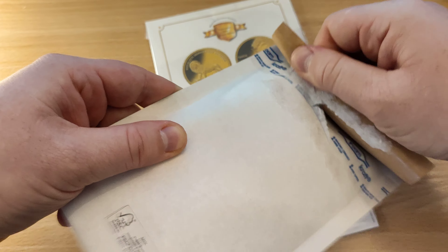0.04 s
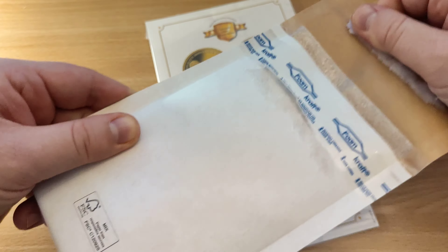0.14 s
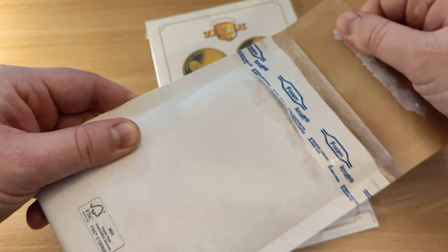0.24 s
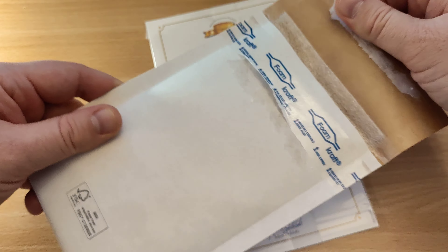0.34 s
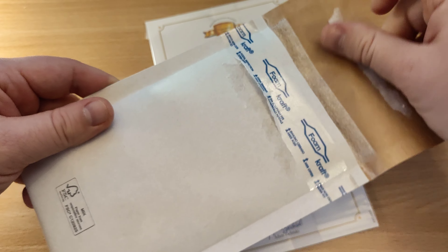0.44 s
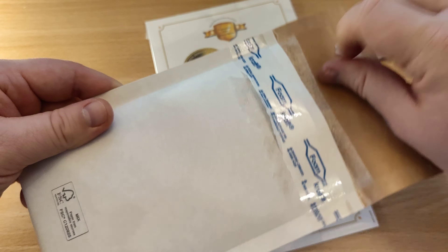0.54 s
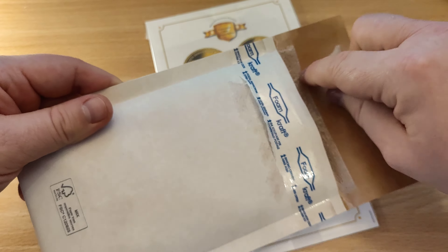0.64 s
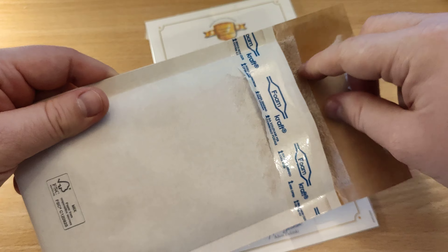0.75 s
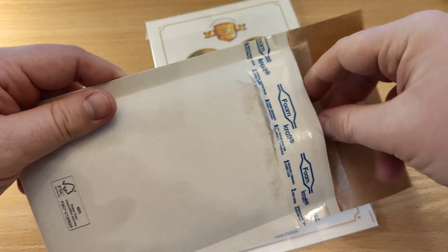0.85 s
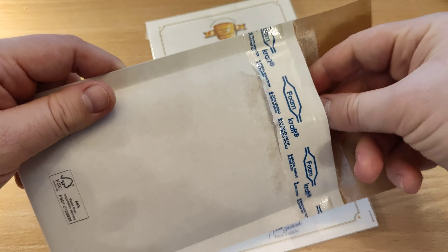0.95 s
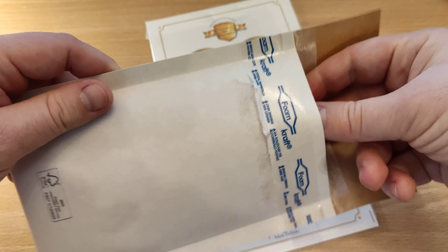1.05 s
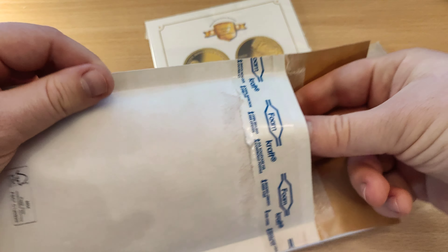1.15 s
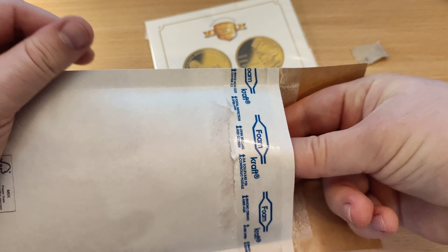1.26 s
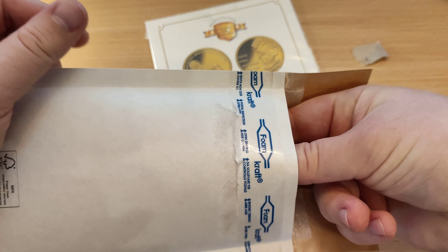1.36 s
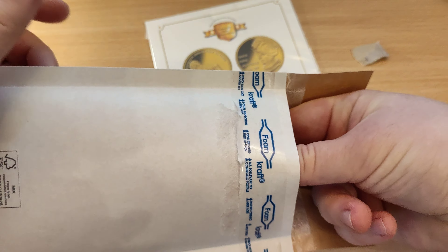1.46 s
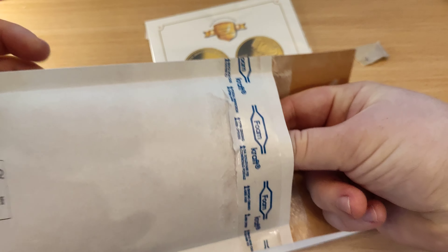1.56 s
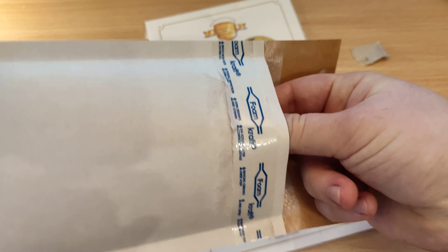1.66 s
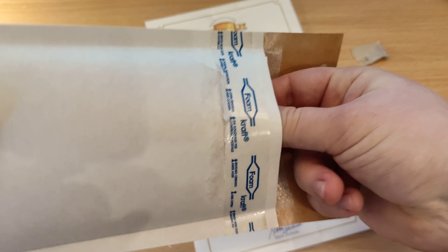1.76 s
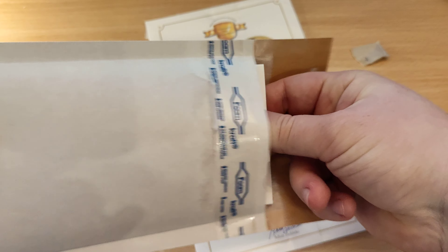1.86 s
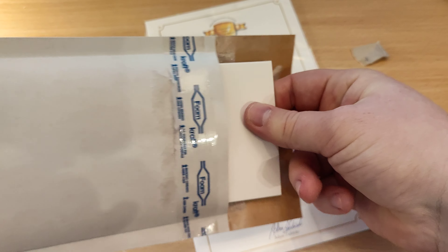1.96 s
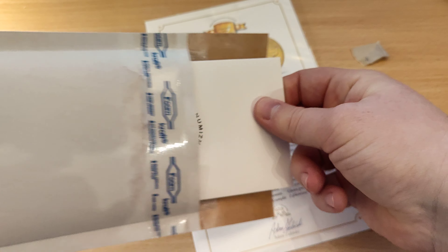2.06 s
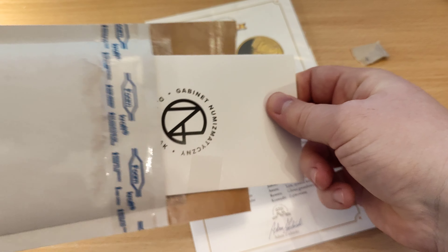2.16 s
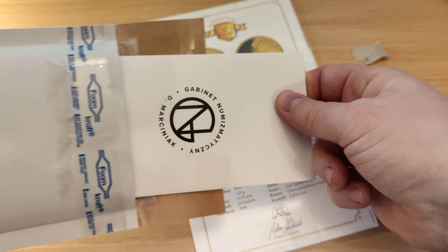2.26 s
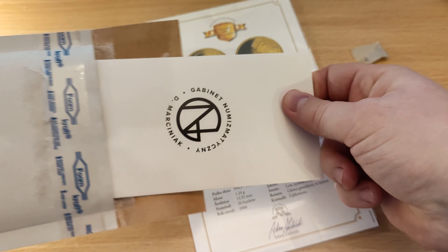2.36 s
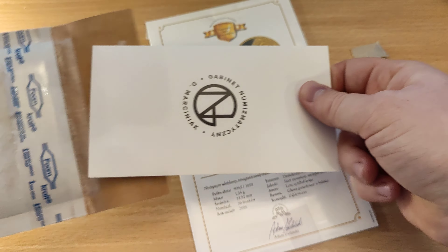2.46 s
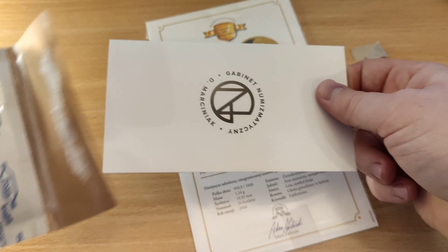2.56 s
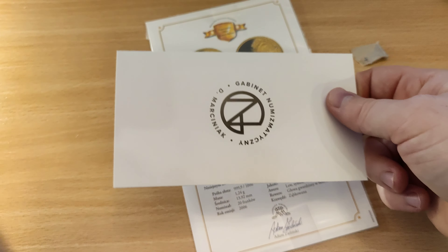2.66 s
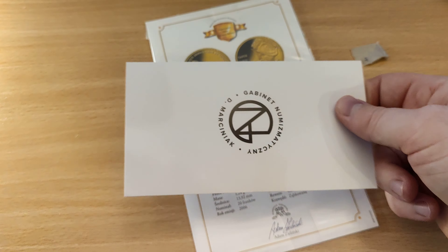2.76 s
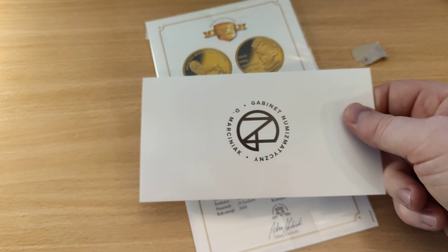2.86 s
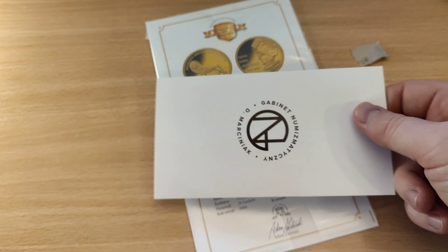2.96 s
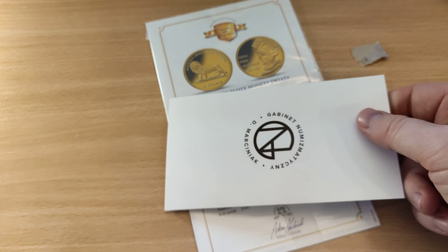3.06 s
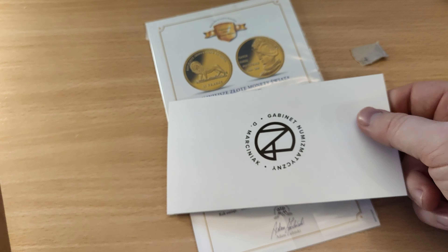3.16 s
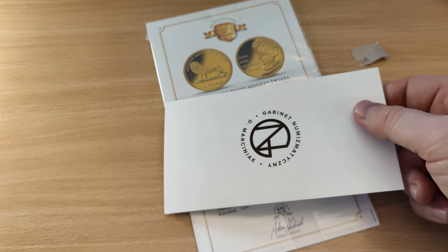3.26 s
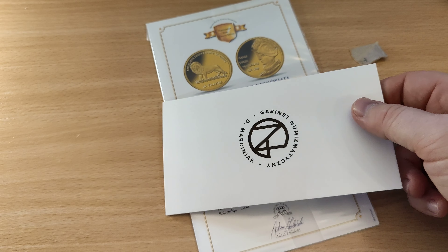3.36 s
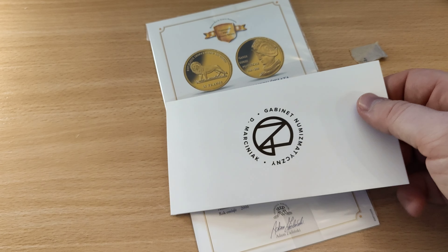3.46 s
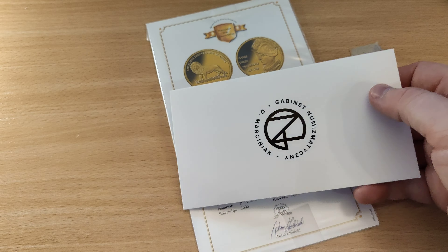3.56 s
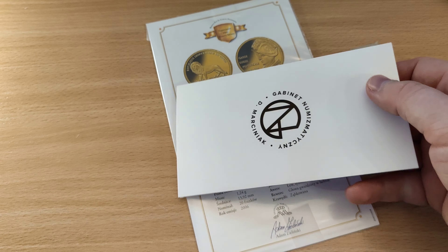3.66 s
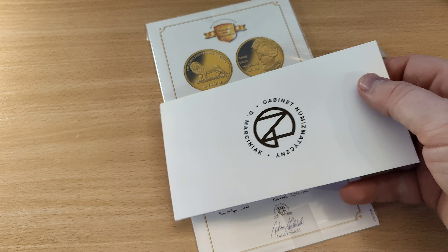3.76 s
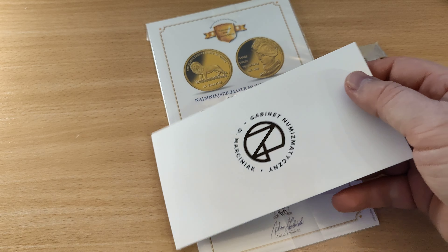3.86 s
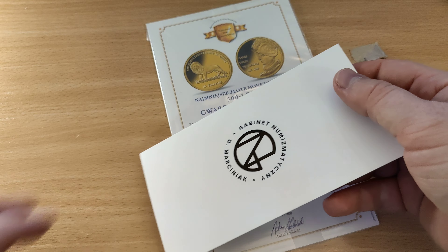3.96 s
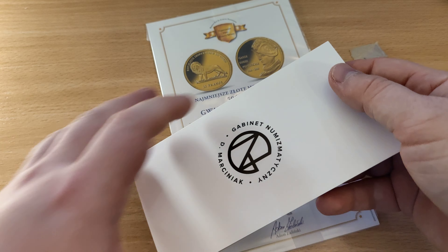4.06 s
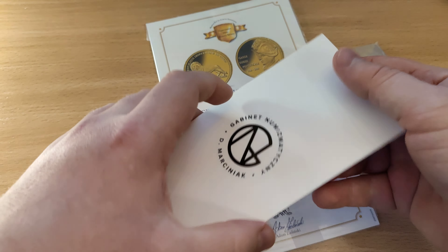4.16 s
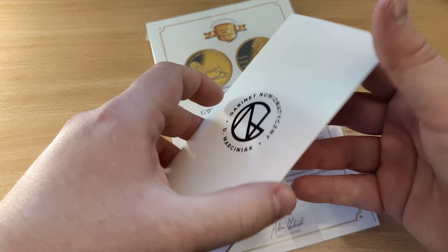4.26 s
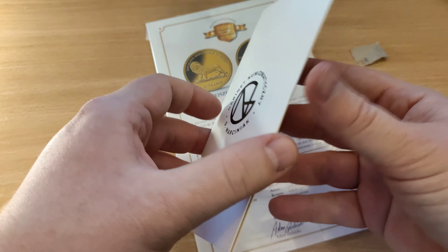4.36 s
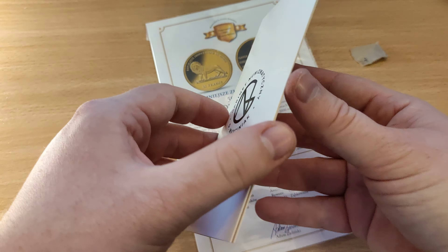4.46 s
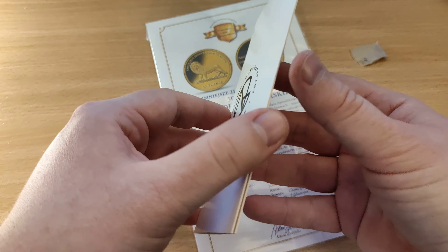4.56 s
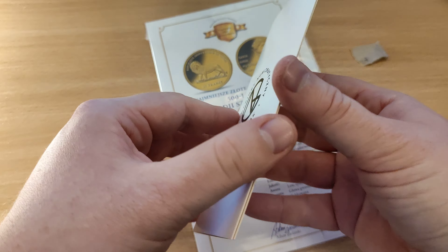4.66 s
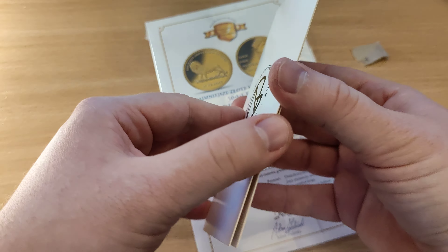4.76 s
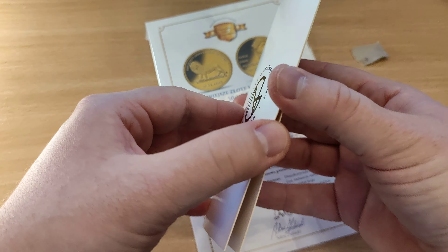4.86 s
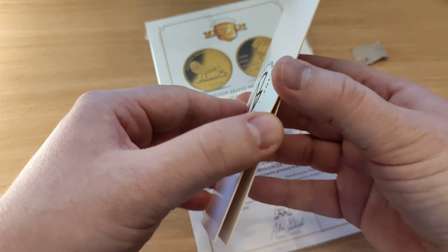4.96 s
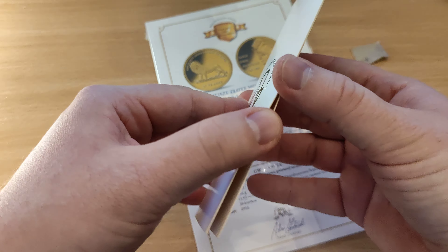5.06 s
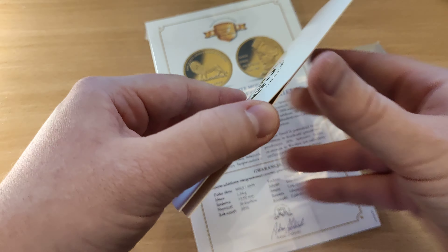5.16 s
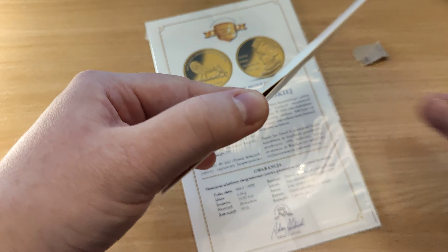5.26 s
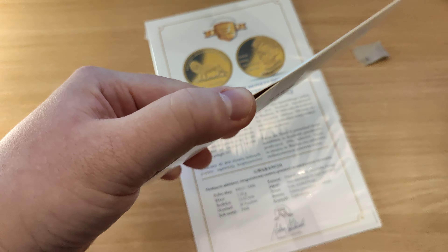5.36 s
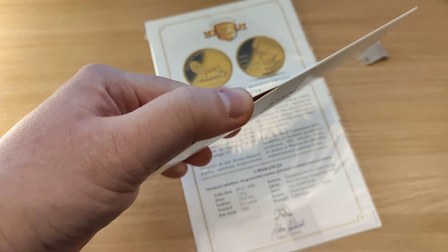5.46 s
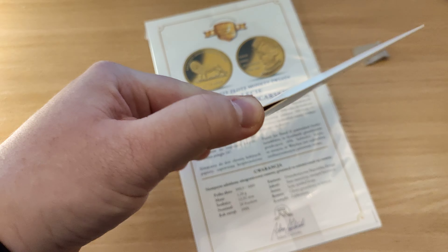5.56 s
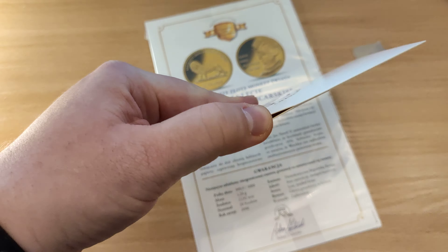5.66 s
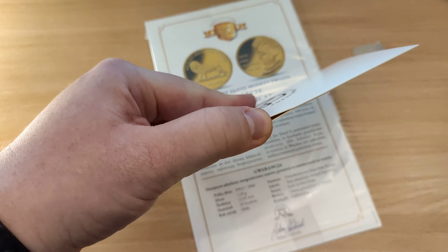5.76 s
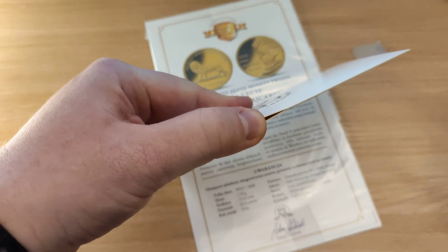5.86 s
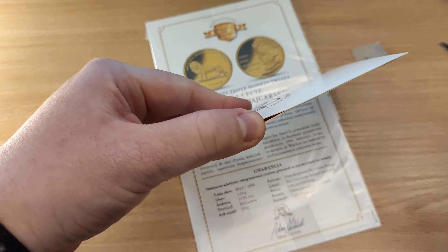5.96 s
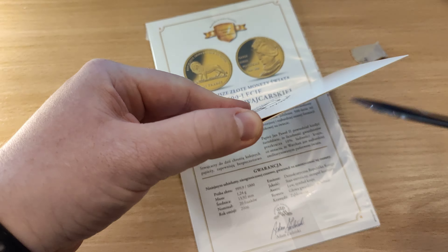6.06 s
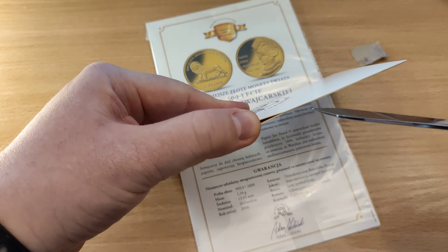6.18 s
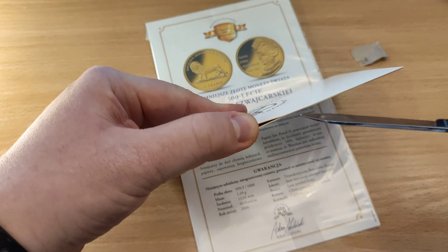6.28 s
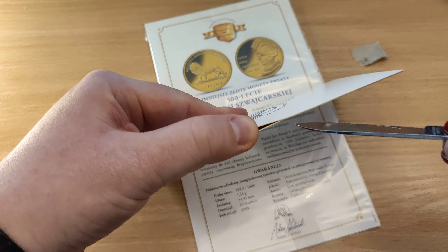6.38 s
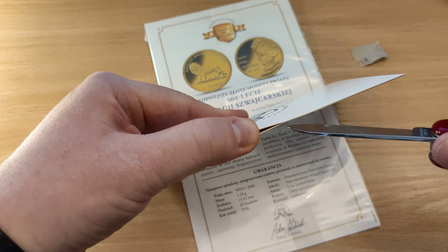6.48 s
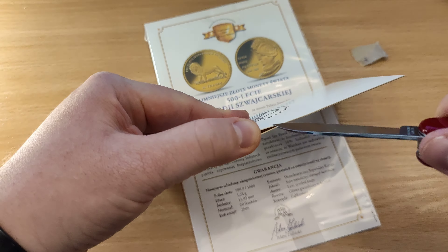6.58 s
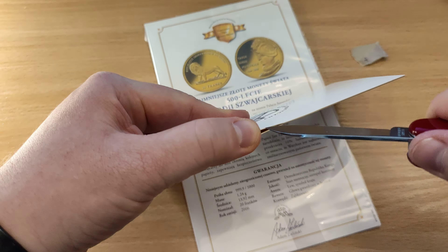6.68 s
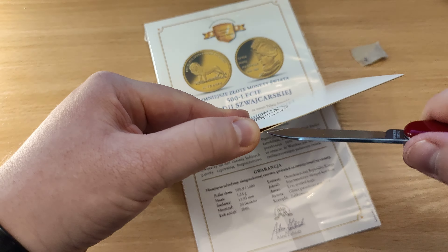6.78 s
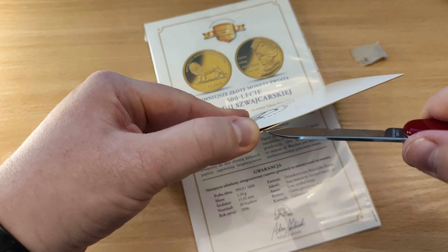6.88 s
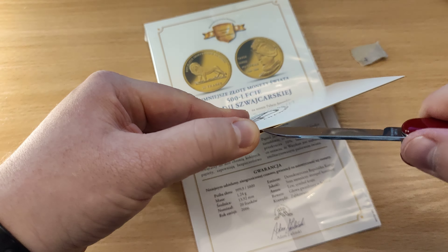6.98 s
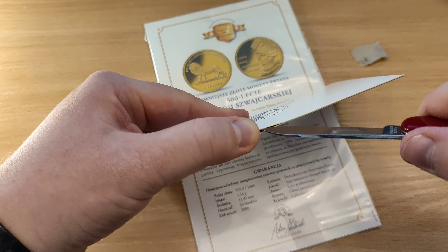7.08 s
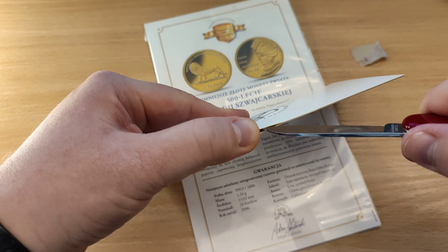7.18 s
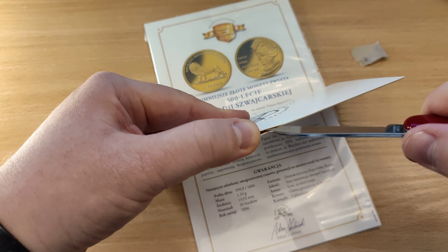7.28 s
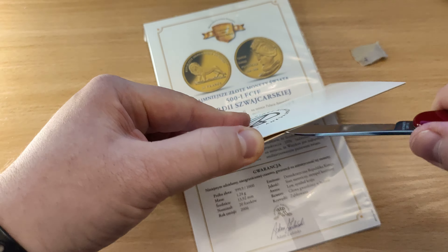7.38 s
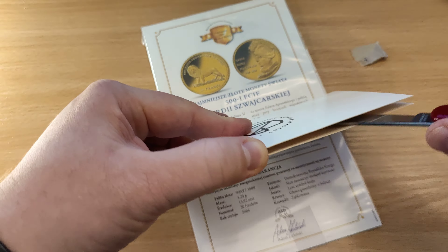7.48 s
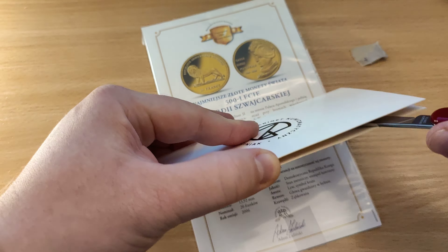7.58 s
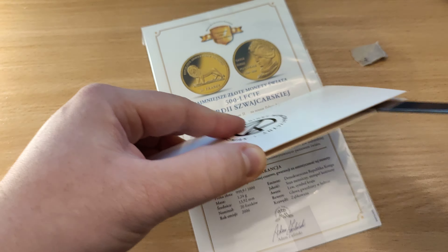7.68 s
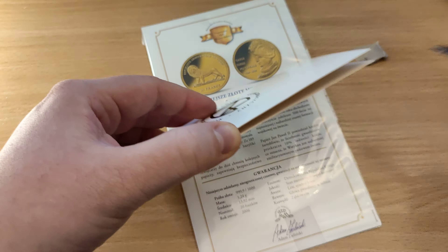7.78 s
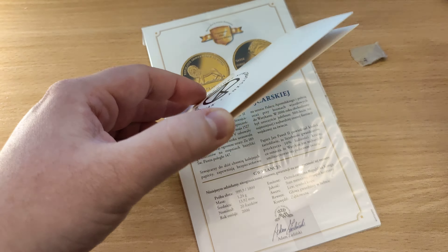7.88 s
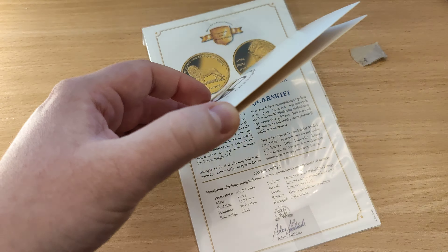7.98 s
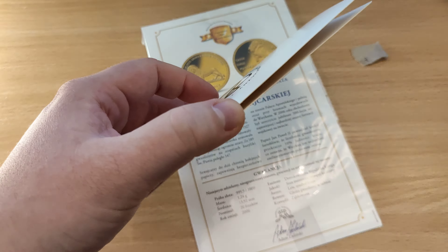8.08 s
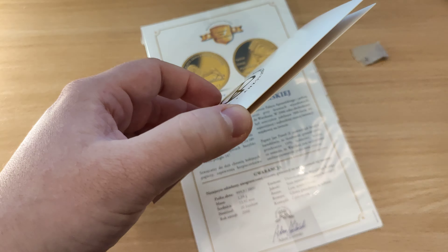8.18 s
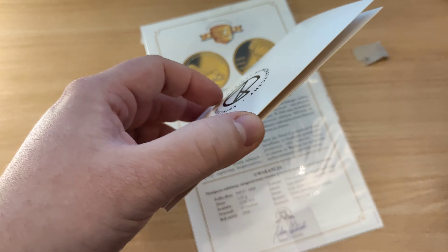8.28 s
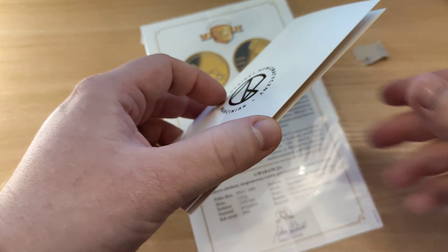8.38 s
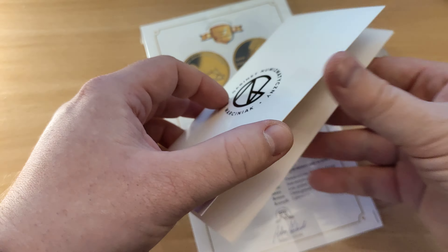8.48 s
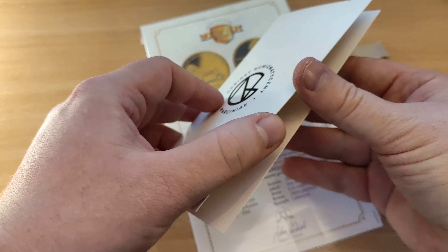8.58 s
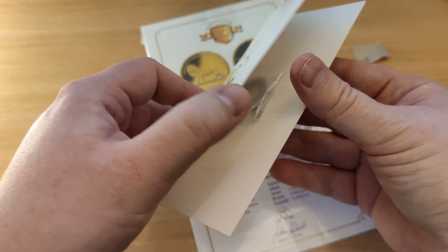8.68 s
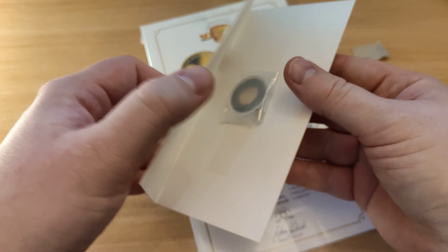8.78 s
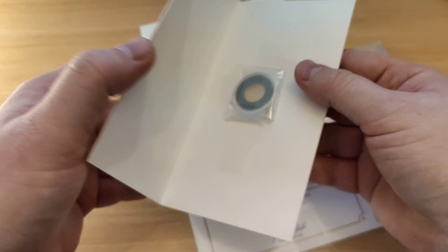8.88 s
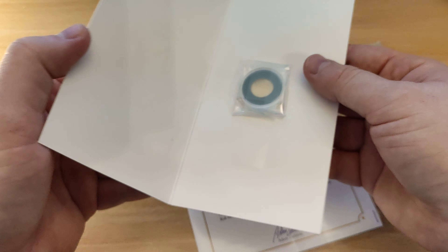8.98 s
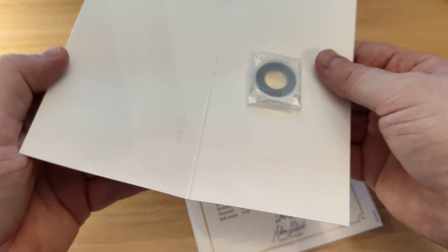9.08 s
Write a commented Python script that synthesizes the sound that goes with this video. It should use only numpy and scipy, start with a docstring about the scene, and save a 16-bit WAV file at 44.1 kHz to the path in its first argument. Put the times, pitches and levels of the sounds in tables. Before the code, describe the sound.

Close stereo microphone at a wooden desk in a small quiet room, with steady low, fuzzy hum and faint air. At 0 s a loud paper rip is already under way; glue rasps and snaps, with the sharpest crack near 0.16 s and brisk rustling to 0.35. Separate pops at 0.67, 0.94 and 1.0 accompany hands entering the mailer. From 1.2 to 2.3 softer rubbing swells and falls; a card slides out with brighter swishes around 2.5-3.1, with soft bumps. A knock at 3.6 and a firmer double clatter at 3.98 and 4.06 mark things set down. Then it is nearly still, with tiny creases. At 5.8-6.1 light blade ticks cluster. Quiet again until brief scrapes at 7.0 and 7.4, a loud seal snap at 7.54, and short rasps to 7.9. Handle taps and desk bumps come at 8.1-8.3, a crisp unfolding crack at 8.58, then faint rustle to about 9.1.

```python
"""At a wooden desk in a quiet room with a low hum, hands peel open a padded paper mailer, slide out
a folded card, set the mailer and a pocket knife down, slit a seal and unfold the card, all close by.
Sliding paper is shaped noise with small ticks; creases, glue and knife clatter are clumps of tiny breaks.
Rasps, desk thumps and knife touches are noise or blows ringing resonances. The room adds short
noise tails to paper and knife, over steady room noise and fuzzy low tones."""
import sys
import numpy as np
from scipy import signal
from scipy.fft import rfft, irfft, next_fast_len
from scipy.io import wavfile
from scipy.ndimage import uniform_filter1d

SR = 44100
rng = np.random.default_rng(int(sys.argv[2]) if len(sys.argv) > 2 else 0)


def wav_record(signal):
    """Record a signal, one row per channel, as 16-bit PCM in the file named by sys.argv[1]."""
    frames = np.transpose(np.atleast_2d(signal))
    bounded = np.clip(frames, -1, 1)
    # unit amplitude maps onto the largest positive 16-bit level
    quanta = np.round(bounded * 32767).astype(np.int16)
    wavfile.write(sys.argv[1], SR, quanta)


N = 402633  # length in samples

# Steady room noise. Each row: frequency in Hz, level per Hz in relative dB.
AIR_SPECTRUM = [(12, -57), (20, -20), (48, -38.5), (125, -11), (175, -15.5), (250, -7.5), (320, -11),
                (477, -17.5), (1020, -35), (1170, -32.5), (6880, -49.5), (15100, -43), (16400, -48.5)]
AIR_DB = -61.5  # overall level
# Fuzzy tones of a far machine. Each row: frequency in Hz, width in Hz, level in dB.
HUMS = [(136.2, 6, -69.5), (196, 12, -71), (250, 30, -62.5), (294.4, 14, -72.5), (1002, 3.2, -82)]
# How alike left and right are. Each row: frequency in Hz, likeness from 0 to 1.
LIKENESS = [(60, 0.4), (180, 1), (550, 0.42), (1650, 0.076), (4970, 0), (15000, 0)]

# Paper slides on paper and skin, one row a stroke. Each row: start of full force in seconds,
# rise, hold and fall in seconds, hiss in dB, sheet rumble in dB over hiss, fizz in dB over hiss.
STROKES = [(0, .01, 0.012, 0.046, -38, -2.5, -6), (0.093, 0.06, 0.037, 0.049, -51.5, -0.5, 2),
           (0.221, 0.089, 0.087, 0.044, -43, -9.5, -39), (0.294, .006, 0.019, 0.011, -56, -9, -32),
           (0.461, 0.039, .005, 0.052, -58.5, 3.5, -4), (0.566, 0.062, 0.0062, 0.038, -59.5, 1, 2.5),
           (0.686, 0.045, 0.04, 0.049, -50.5, -5, -10), (0.87, 0.039, 0.065, .05, -59.5, -1, -3),
           (0.985, 0.1, .005, 0.16, -50.5, -4.5, -3), (1.177, 0.14, 0.053, .1, -58.5, -11, -11),
           (1.354, 0.32, .005, 0.16, -48, -6, -2), (1.679, 0.13, 0.018, 0.059, -54.5, -1, 1),
           (1.743, 0.029, 0.0044, 0.028, -54, -11, 2), (1.852, 0.011, .005, 0.09, -51, 1.5, -15),
           (1.962, 0.082, 0.029, 0.57, -51, -7, 1), (2.138, 0.039, 0.018, .1, -52.5, -18, 8),
           (2.286, 0.39, 0.021, 0.16, -63.5, -1, 14), (2.508, 0.16, 0.0054, 0.087, -69.5, -7, 22.5),
           (2.541, 0.076, 0.052, 0.063, -54, 1.5, -6), (2.661, 0.098, 0.02, 0.014, -46, -17, -6),
           (2.973, 0.062, 0.0046, 0.039, -57, -2, -11), (3.088, .01, .12, 0.031, -62.5, -18, -1),
           (3.115, 0.037, 0.0076, 0.012, -47, -1, -6), (3.29, 0.043, 0.004, 0.34, -66, -7, 1),
           (3.454, 0.076, 0.14, 0.16, -62.5, -15, -0.5), (4.088, 0.14, 0.026, 0.23, -63.5, 1.5, -24.5),
           (4.267, 0.2, 0.1, 0.046, -71.5, -14.5, -3.5), (4.848, 0.14, 0.076, 0.029, -69, -0.5, -16),
           (5.798, 0.05, 0.11, 0.027, -68, -10, 1), (6.09, 0.17, 0.0044, 0.013, -60, -4.5, 0),
           (7.037, 0.014, 0.0031, 0.01, -55, 1, -26), (7.388, 0.017, .003, 0.033, -51.5, -2, -24),
           (7.587, 0.092, .003, 0.038, -43, -7, -14), (7.778, 0.056, 0.0066, 0.013, -50, -5.5, -10),
           (7.842, 0.03, 0.0059, 0.018, -56, -5, -18), (8.278, 0.25, 0.05, 0.11, -66, 4.5, 1.5),
           (8.721, 0.02, 0.0035, 0.018, -55, 2, -19)]
EDGES_DB = 20  # how far under full force a stroke is at the start of its rise and the end of its fall
# The hands never rest. Each row: time in seconds, hiss in dB.
FIDGET = [(0, -63.5), (1.7, -80), (1.8, -91), (2.7, -80), (4, -82.5), (5.7, -80.5), (6.4, -85.5),
          (7.35, -89.5), (7.5, -75.5), (8.05, -83), (8.4, -80.5), (8.7, -74.5), (8.8, -79.5), (9.13, -75)]
FIDGET_RUMBLE_DB, FIDGET_FIZZ_DB = -71, -7  # steady level in dB; dB over hiss
# Tone of the sheet's rumble. Each row: frequency in Hz, level per Hz in relative dB.
RUMBLE_SPECTRUM = [(250, -18.5), (500, -3.5), (900, 0), (1700, -9), (3000, -26)]
# Tone of the rubbing hiss. Each row: frequency in Hz, level per Hz in relative dB.
HISS_SPECTRUM = [(700, -36.5), (1800, 3), (3000, 1), (5500, -0.5), (8500, -11.5), (14000, -31.5)]
# Tone of the high fizz. Each row: frequency in Hz, level per Hz in relative dB.
FIZZ_SPECTRUM = [(4000, -29.5), (7500, -1.5), (10000, -1.5), (14500, 2), (16500, -4)]
# Tone of forearms on the desk top. Each row: frequency in Hz, level per Hz in relative dB.
DESK_SPECTRUM = [(30, -23), (130, -4.5), (280, 4), (550, -30.5)]
CRACKLE_PER_S, CRACKLE_DB = 420, -5.5  # single fibre breaks: average rate; dB over hiss

# Creases and glue let go, and the knife's touches clatter. Each row: start in seconds, peak in dB,
# low ring in Hz, share of the ring in dB, crack in Hz, share of the treble in dB,
# time to fall 60 dB in seconds.
SNAPS = [(0.004, -27.5, 950, -9, 5350, 5, 0.04), (0.106, -35, 1060, -11, 6500, -14, 0.0088),
         (0.1554, -27, 1040, 2, 3980, 1, 0.034), (0.1582, -9.5, 1500, -17, 4600, -15, 0.0066),
         (0.198, -32, 980, 7, 2950, -20, 0.011), (0.207, -19, 1000, -4, 2010, -17, 0.0096),
         (0.226, -41, 2060, -2, 2620, -28, 0.017), (0.256, -31.5, 1180, 12, 2990, -19, 0.024),
         (0.26, -33.5, 1170, -27, 4400, -16, 0.014), (0.291, -31.5, 1130, -9, 3900, -19, 0.022),
         (0.299, -32, 1100, -19, 4260, -18, 0.025), (0.312, -32, 1110, -13, 4500, -17, 0.016),
         (0.376, -35, 1050, -3.5, 2200, -34, 0.017), (0.437, -41, 1000, 3, 4300, -25, 0.037),
         (0.543, -40, 1450, -2, 2680, -29, 0.05), (0.675, -17, 1030, -5.5, 2300, -13, 0.029),
         (0.848, -41.5, 1310, 23, 2540, -7, 0.021), (0.876, -43, 1030, 11, 2110, -29, 0.033),
         (0.889, -32, 860, 30, 2480, -24, 0.015), (0.935, -22, 1480, 15, 2100, -15, 0.053),
         (0.943, -22, 1610, -2.5, 3840, -11, 0.0097), (1.011, -18, 832, -1, 3260, -1.5, 0.025),
         (1.146, -41.5, 390, 6.5, 2500, -22, 0.031), (1.175, -38.5, 774, 2, 3300, -22, 0.025),
         (1.221, -38, 760, 24, 3620, -21, 0.032), (1.346, -38.5, 766, -1, 2440, -24, 0.033),
         (1.382, -28, 890, 39, 3110, -19, 0.031), (1.606, -46.5, 1670, -6, 2600, -14, 0.048),
         (1.839, -45.5, 1580, -5, 3300, -12, 0.014), (1.852, -50, 1050, -15, 5500, -12, .012),
         (1.863, -40.5, 1040, -1, 5100, -14, 0.028), (1.871, -38, 1100, -13, 5160, -32, 0.062),
         (1.894, -38.5, 1990, -17, 2090, -27, 0.022), (1.902, -42, 2020, -3, 2100, -27, 0.013),
         (1.967, -38, 990, -1, 2840, -13, 0.035), (1.974, -38.5, 1720, 9, 2840, -13, 0.026),
         (2.15, -44, 1830, -23.5, 6290, 6, .015), (2.217, -30, 1030, -16, 2600, -27, 0.054),
         (2.252, -42, 900, -1, 2000, -20, 0.011), (2.516, -40.5, 850, 13, 6210, -12, 0.028),
         (2.554, -31.5, 840, -10, 2700, -8, 0.024), (2.575, -32, 1060, -5, 4100, -13, 0.025),
         (2.657, -34.5, 1124, -19, 5300, -7, 0.016), (2.958, -46, 695, -3, 5600, -20, 0.032),
         (3.052, -52.5, 1390, -2, 3930, -1, 0.04), (3.117, -36.5, 1400, 1, 2800, -26, 0.024),
         (3.262, -43, 487, -20, 2670, -11, 0.09), (3.586, -34, 578, -11, 5000, -4.5, 0.048),
         (3.979, -28, 1240, -4.5, 4500, -8.5, 0.18), (4.061, -27, 1127, -2, 3100, -15, 0.19),
         (4.508, -42.5, 1954, -37, 2590, -9, 0.092), (4.725, -42, 1830, -35.5, 2510, -3, 0.079),
         (4.83, -49.5, 524, -16, 2500, -7, 0.062), (5.044, -47.5, 1860, -8, 3020, -7, 0.048),
         (5.076, -42, 554, -33, 6440, -10, 0.024), (5.188, -48.5, 1764, -6.5, 2400, -6, 0.044),
         (5.228, -44, 2090, -15, 5600, -18.5, 0.05), (5.777, -53.5, 815, -18, 5370, -16.5, 0.021),
         (5.864, -44, 570, -9, 2560, -26, 0.049), (5.88, -38.5, 1080, -20, 4800, -32, 0.04),
         (5.941, -46, 1480, -11, 3900, -4, 0.056), (5.958, -35.5, 740, -16, 4800, -24, 0.056),
         (6.003, -43, 1010, -3.5, 2410, 0.5, 0.03), (6.023, -40.5, 480, -12, 4740, -26, 0.036),
         (6.057, -41.5, 1080, -13, 4760, -27, 0.032), (6.086, -46, 530, -17, 4700, -23, 0.025),
         (6.166, -55, 506, -1, 6630, -1, 0.045), (6.239, -54, 517, -17, 6720, -7, 0.05),
         (6.844, -59.5, 781, -2, 3000, -14, 0.019), (7.022, -46, 555, -16, 2920, -14, 0.02),
         (7.537, -16, 1100, -11, 3230, -12, 0.025), (7.93, -52, 1310, -5, 3020, 2.5, 0.012),
         (7.992, -38.5, 2050, -17, 5070, -2, 0.056), (8.108, -41.5, 885, -10.5, 2720, -8.5, 0.043),
         (8.163, -48, 1050, -17, 5800, -2, 0.017), (8.192, -41, 880, -5, 2760, 1.5, 0.1),
         (8.226, -34.5, 760, -1, 2400, -16, 0.055), (8.261, -37, 530, -0.5, 4970, -30, 0.099),
         (8.27, -40, 950, 1, 3500, -20, 0.033), (8.32, -43, 830, -14, 2060, -15, 0.063),
         (8.538, -47.5, 2050, -3, 2740, 6.5, 0.03), (8.572, -31, 1780, 16, 2270, 4, 0.029),
         (8.578, -23.5, 950, -11, 5200, -1.5, 0.085), (8.645, -50, 2087, 0, 2100, -20, 0.021),
         (8.95, -48.5, 854, 3.5, 5630, 7, 0.023)]
# Spans where the clumps ring in narrower bands. Each row: start in seconds, end in seconds.
NARROW_SPANS = [(.05, .14), (5.87, 6.1), (7.9, 8.2)]
# Resonance width as a share of its frequency: in those spans, elsewhere, and extra per second of clump.
NARROW_DAMPING, DAMPING, DAMPING_PER_S = 0.17, 0.22, 4
FIRST_PUSH = 7  # size of the first break in a clump that takes 0.039 s to fall 60 dB
RISE_SHARE, LONGEST_RISE_S = 0.039, 0.003  # a clump builds up over this share of its fall time, at most this long

# Paper rubs on glue or blade and the sheet sings in one band. Each row: start in seconds,
# end in seconds, frequency in Hz, width in Hz, level in dB.
RASPS = [(.074, .152, 1080, 250, -44.5), (7.741, 7.79, 2500, 350, -57), (7.829, 7.87, 2430, 350, -61)]

# Hands, mailer and knife land on the desk. Each row: start in seconds, peak in dB, pitch in Hz,
# time to fall 60 dB in seconds.
THUMPS = [(0.158, -39.5, 418, 0.062), (0.432, -40.5, 266, 0.11), (0.673, -35, 302, 0.06),
          (0.884, -42, 179, 0.11), (0.929, -39.5, 384, 0.17), (1.009, -45, 199, 0.1),
          (1.377, -41, 375, 0.031), (1.869, -48, 117, 0.17), (2.564, -43, 243, 0.13),
          (2.957, -37, 196, 0.15), (3.26, -45.5, 218, 0.25), (3.581, -35.5, 134, 0.13),
          (3.918, -50.5, 79.5, 0.074), (3.977, -33, 278, 0.23), (4.059, -33, 427, 0.2),
          (4.06, -38, 191, 0.15), (7.535, -34.5, 436, 0.13), (8.225, -32.5, 625, 0.16),
          (8.235, -42, 131, 0.31), (8.272, -36.5, 250, 0.24)]

# Ringing tones of the knife's handle. Each row: frequency in Hz, relative level in dB,
# time to fall 60 dB in seconds.
HANDLE = [(950, 3, 0.032), (2670, -6, 0.035)]
# Ringing tones of the knife's blade. Each row: frequency in Hz, relative level in dB,
# time to fall 60 dB in seconds.
BLADE = [(2060, -11, 0.033), (4520, -6, 0.035), (5200, -8, 0.023), (6340, 4, 0.014), (7970, 3.5, .02)]
# Touches of the handle. Each row: start in seconds, peak in dB, time for the rattle to fall 60 dB in seconds.
HANDLE_TAPS = [(8.109, -50, 0.16), (8.195, -41.5, 0.19)]
# Touches of the blade. Each row: start in seconds, peak in dB, time for the rattle to fall 60 dB in seconds.
BLADE_TAPS = [(5.803, -44.5, .02), (5.883, -38, 0.041), (5.959, -36.5, 0.058), (6.023, -41, .04),
              (6.057, -41, 0.027), (6.084, -52, .02)]

# How fast the room's answer dies. Each row: frequency in Hz, time to fall 60 dB in seconds.
ROOM_DECAY = [(200, 0.82), (530, 0.095), (1400, 0.13), (3700, 0.15), (9700, 0.085)]
EDGE_HZ = 15800  # top of the sound's range


def gain_of(db):
    """Turns decibels into gain."""
    return 10 ** (np.asarray(db) / 20)


def evened(x):
    """Scales a sound to an average (rms) strength of 1."""
    return x / np.sqrt(np.mean(x ** 2) + 1e-20)


def loudest(x, size):
    """Finds the strongest rms over any stretch of this many samples, both channels together."""
    return np.sqrt(uniform_filter1d((x ** 2).mean(0), size=size).max())


def read(points, hz):
    """Reads a curve between its points, on a log-frequency axis."""
    f, value = np.transpose(points)
    return np.interp(np.log(hz + 1), np.log(f + 1), value)


def add(mix, s, sound):
    """Mixes a sound in at s seconds."""
    part = mix[:, max(round(s * SR), 0):][:, :sound.shape[1]]
    part += sound[:, :part.shape[1]]


def ring(x, hz, width):
    """Lets a sound ring one resonance; a narrow width rings longer."""
    r = np.exp(-np.pi * abs(width) / SR)
    return signal.lfilter([1, -1], [1, -2 * r * np.cos(2 * np.pi * hz / SR), r * r], x)


def paired(a, b, same):
    """Builds left and right so that the right is as like the left as asked, the rest being b."""
    return np.array([a, same * a + np.sqrt(1 - same ** 2) * b])


def colour(x, points):
    """Gives both channels a spectrum, alike mainly in the bass."""
    size = next_fast_len(N)
    hz = np.fft.rfftfreq(size, 1 / SR)
    same = np.clip(read(LIKENESS, hz), 0, 1)
    z = paired(rfft(x[0], size), rfft(x[1], size), same) * gain_of(read(points, hz))
    return evened(irfft(z, size)[:, :N])


def air():
    """Steady room noise, plus noise through narrow resonances for the fuzzy low tones."""
    hums = np.zeros((2, N))
    channel_mix = np.array([[1, -0.071], [1, -0.25]])  # the tones are nearly alike left and right
    for hz, width, db in HUMS:
        noise = channel_mix @ rng.standard_normal((2, N))
        hums += gain_of(db) * evened(ring(ring(noise, hz, width), hz, 2 * width))
    return gain_of(AIR_DB) * colour(rng.standard_normal((2, N)), AIR_SPECTRUM) + hums


def force():
    """Gains of hiss, rumble and fizz: the restless hands plus every stroke's rise, hold and fall."""
    t = np.arange(0, N + 64, 64) / SR
    hiss_db = np.interp(t, *np.transpose(FIDGET))
    power = gain_of([hiss_db, FIDGET_RUMBLE_DB + 0 * t, hiss_db + FIDGET_FIZZ_DB]) ** 2
    for s, rise, hold, fall, db, rumble_db, fizz_db in STROKES:
        before = np.maximum(s - t, 0) / max(rise, 1e-3)
        after = np.maximum(t - s - abs(hold), 0) / max(fall, 1e-3)
        shares_db = np.array([[0], [rumble_db], [fizz_db]])
        power = power + gain_of(db - EDGES_DB * (before + after) + shares_db) ** 2
    return [np.interp(np.arange(N) / SR, t, np.sqrt(p)) for p in power]


def crackle():
    """Separate fibre breaks of uneven size, each a tick at one of several pitches and sides."""
    happens = rng.random(N) < CRACKLE_PER_S / SR
    size = gain_of(3.6 * np.minimum(rng.exponential(1, N), 4)) * happens
    pitches = np.geomspace(900, 9000, num=12)
    kind, out = rng.integers(0, len(pitches), N), np.zeros((2, N))
    for k, hz in enumerate(pitches):
        side = rng.uniform(-1.1, 1.0)
        sides = np.array([[1, side], [side, 1]])[k % 2][:, None]
        out += sides * ring(size * (kind == k), hz, 0.49 * hz) * np.sqrt(hz)
    return evened(out)


def slide():
    """Rubbing paper: dense noise for the fibres, with small bursts and a force that wavers fast."""
    hiss, rumble, fizz = force()
    waver = uniform_filter1d(uniform_filter1d(rng.standard_normal(N), size=300), size=300)
    force_db = 1.6 * evened(waver)
    bursts = gain_of(2.06 * np.minimum(rng.exponential(1, N), 4)) * (rng.random(N) < 300 / SR)
    burst_tails = signal.lfilter([1], [1, -.97], bursts)
    fibres = rng.standard_normal((2, N)) * (1 + 0.41 * burst_tails)
    layers = hiss * colour(fibres, HISS_SPECTRUM)
    layers += rumble * colour(fibres, RUMBLE_SPECTRUM)
    layers += fizz * colour(fibres, FIZZ_SPECTRUM)
    layers += (hiss + fizz) * gain_of(-15) * colour(fibres, DESK_SPECTRUM)  # forearms drag on the desk top
    layers += hiss * gain_of(CRACKLE_DB) * crackle()
    # random patches of time and pitch make the rubbing noise louder or softer
    _, _, z = signal.stft(layers, SR, nperseg=256)
    patches = uniform_filter1d(rng.standard_normal(z.shape[1:]), size=2, axis=0)
    patches = uniform_filter1d(patches, size=12)
    patchy = signal.istft(z * gain_of(2.6 * evened(patches)), SR, nperseg=256)[1][:, :N]
    return gain_of(force_db) * patchy


def damping_at(s, t60):
    """Clumps ring in narrower bands in some spans; elsewhere broader, more so in long clumps."""
    narrow = any(a < s < b for a, b in NARROW_SPANS)
    return NARROW_DAMPING if narrow else DAMPING + DAMPING_PER_S * t60


def snap(peak_db, hz, ring_db, crack_hz, treble_db, t60, damping):
    """A clump of tiny breaks: a short low ring, a bright crack and a spray of treble."""
    t = np.arange(4096) / SR
    noise, sizes, other = rng.standard_normal((3, len(t)))
    rise = np.minimum(t / np.clip(RISE_SHARE * t60, 1 / SR, LONGEST_RISE_S), 1)
    fade = gain_of(-60 * t / np.clip(t60, .004, .2)) * rise
    lumps = gain_of(3.27 * evened(uniform_filter1d(sizes, size=30)))  # breaks come in bunches
    alike = np.array([noise, noise + 0.67 * other]) * lumps * fade  # long waves reach both sides alike
    apart = np.array([noise, 0.16 * noise + other]) * lumps * fade
    # the first break is one sudden jolt, harder in long clumps
    push = FIRST_PUSH * np.sqrt(abs(t60) / 0.039)
    alike[:, 0] += push
    apart[:, 0] += push * np.array([.8, .4])
    damping = np.clip(damping, .04, 1.2)
    low_ring = ring(ring(alike, hz, damping * hz), hz, 2.0 * hz)
    crack = evened(ring(apart, crack_hz, damping * crack_hz))
    crack = crack + 2.2 * damping * evened(ring(apart, 5000, 5200))
    crack = signal.sosfilt(signal.butter(1, 8000, fs=SR, output="sos"), crack)
    treble = signal.sosfilt(signal.butter(2, 6000, "high", fs=SR, output="sos"), apart)
    out = gain_of(ring_db) * evened(low_ring)
    out = out + gain_of(-4.0) * evened(crack) + gain_of(treble_db) * evened(treble)
    return gain_of(peak_db) * out / loudest(out, 44)


def rasp(length, hz, width, level_db):
    """Uneven slips of rubbing paper drive one resonance of the sheet."""
    t = np.arange(0, length, 1 / SR)
    noise, grip, other = rng.standard_normal((3, len(t)))
    grip_db = 4.0 * evened(uniform_filter1d(grip, size=300))
    slips = np.array([noise, noise + .5 * other]) * gain_of(grip_db)
    song = evened(ring(ring(slips, hz, width), hz, 2 * width))
    return gain_of(level_db) * song * np.sqrt(np.sin(np.pi * t / length))


def thump(peak_db, hz, t60):
    """A soft push shakes the desk top in a blurred low ring and sways the frame, more for deep pitches."""
    t = np.arange(12000) / SR
    fade = gain_of(-60 * t / np.clip(t60, .02, .4)) * np.minimum(t / 0.0034, 1)
    push, other = rng.standard_normal((2, 2, len(t))) * fade
    top, frame = np.array([push, push + 0.75 * other]).transpose(1, 0, 2)  # each with left and right
    shake = evened(ring(ring(top, hz, 0.6 * hz), hz, hz))
    sway = evened(ring(ring(frame, 92, 86), 92, 86))
    shake = shake + 0.19 * (230 / hz) ** 0.5 * sway
    return gain_of(peak_db) * shake / loudest(shake, 150)


def knife(modes, peak_db, t60):
    """A blow and a short rattle of bounces ring the knife's own tones."""
    t = np.arange(6000) / SR
    chance, sizes = rng.random(len(t)), rng.standard_normal(len(t))
    bounces = sizes * (chance < 900 / SR) * 2.2
    blows = (bounces + (t == 0)) * gain_of(-60 * t / np.clip(t60, .005, .2))
    out = np.zeros((2, len(t)))
    for hz, db, dies in modes:
        turn = 2 * np.pi * hz * t + np.array([[0], [hz / 3000]])  # short waves reach the sides out of step
        tone = gain_of(db - 60 * t / max(dies, .005)) * np.sin(turn)
        out += signal.fftconvolve(blows[None], tone, axes=1)[:, :len(t)]
    return gain_of(peak_db) * out / loudest(out, 44)


def room(x):
    """Desk, arms and walls answer with noise tails, each band dying at its own speed."""
    hz, t, (a, b) = signal.stft(rng.standard_normal((2, SR // 2)), SR, nperseg=128)
    same = np.clip(read(LIKENESS, hz), 0, 1)[:, None]
    fade = gain_of(-60 * t / read(ROOM_DECAY, hz)[:, None])
    tail = signal.istft(paired(a, b, same) * fade, SR, nperseg=128)[1]
    tail = tail * np.clip(np.arange(tail.shape[1]) / SR / .006, 0, 1)  # builds up over 6 ms
    tail = tail / np.linalg.norm(tail, axis=1, keepdims=True)
    return signal.fftconvolve(x, tail, axes=1)[:, :N]


def scene():
    """Paper, knife and desk sounds, the room's answer to paper and knife, and the room noise."""
    near, desk = slide(), np.zeros((2, N))
    for s, *row in SNAPS:
        add(near, s, snap(*row, damping_at(s, row[-1])))
    for s, end, *row in RASPS:
        add(near, s, rasp(end - s, *row))
    for s, *row in THUMPS:
        add(desk, s, thump(*row))
    for modes, taps in ((HANDLE, HANDLE_TAPS), (BLADE, BLADE_TAPS)):
        for s, *row in taps:
            add(near, s, knife(modes, *row))
    wet = gain_of(-10) * room(near)
    return near + wet + desk + air()


def record(dry):
    """Cuts off everything above the top of the range with a steep low-pass filter."""
    lowpass = signal.firwin(255, EDGE_HZ, window=("kaiser", 7), fs=SR)
    return signal.oaconvolve(dry, lowpass[None], "same")


dry = scene()
out = record(dry)
wav_record(out)
```